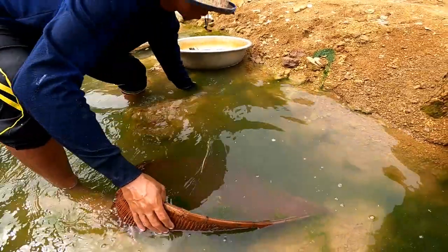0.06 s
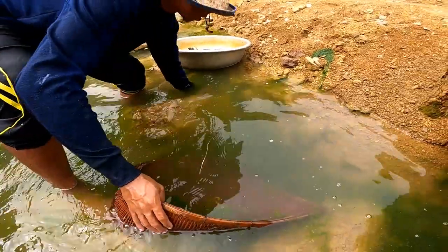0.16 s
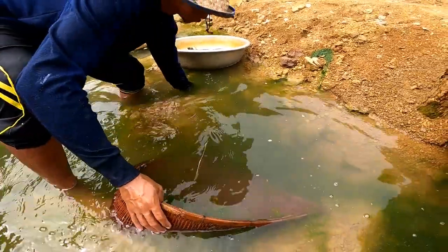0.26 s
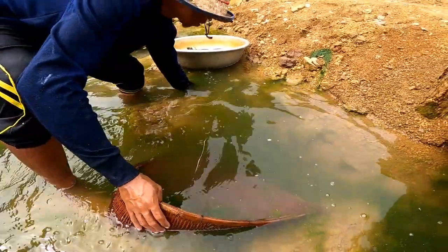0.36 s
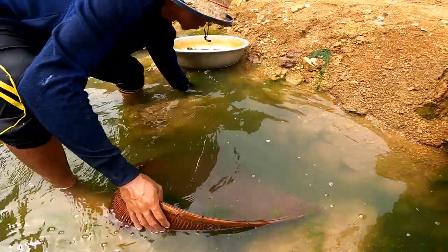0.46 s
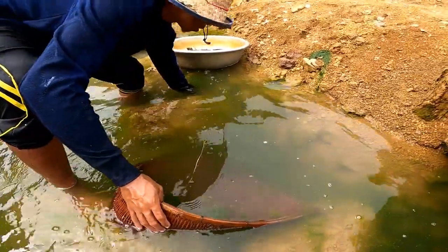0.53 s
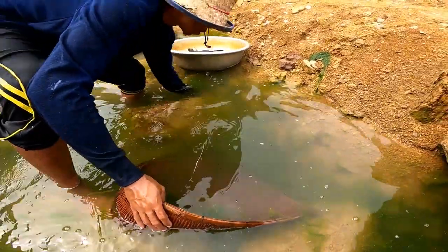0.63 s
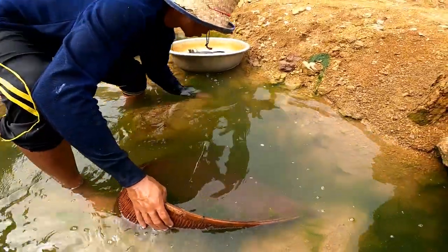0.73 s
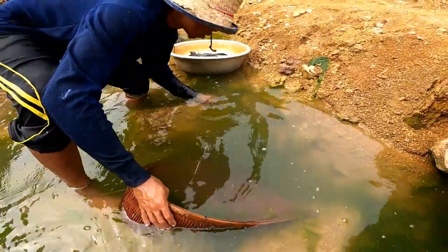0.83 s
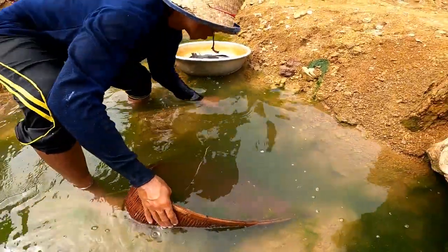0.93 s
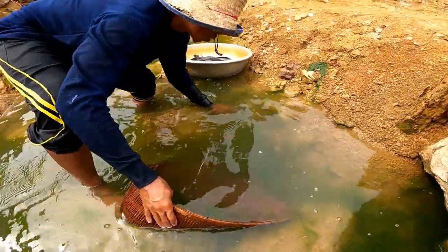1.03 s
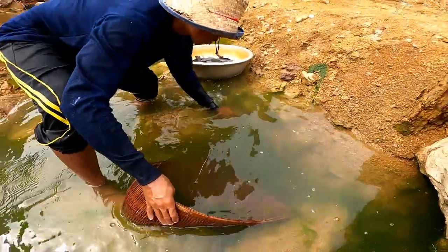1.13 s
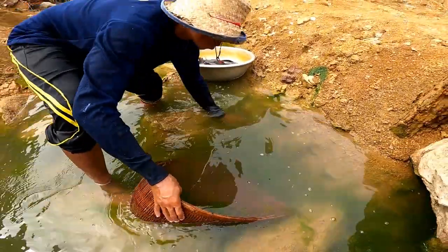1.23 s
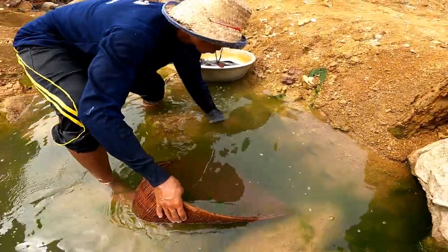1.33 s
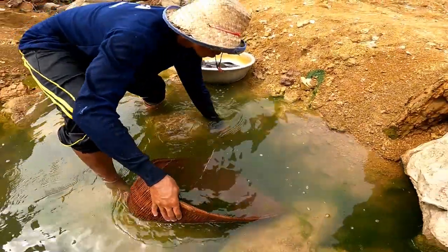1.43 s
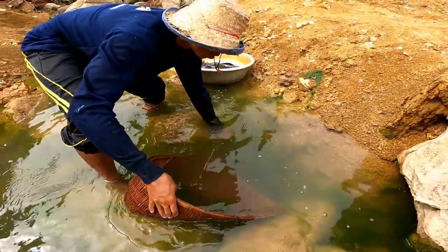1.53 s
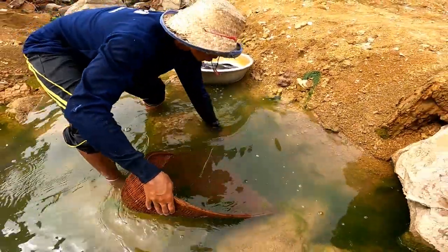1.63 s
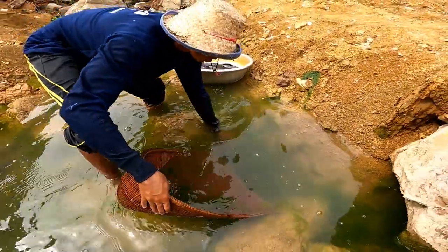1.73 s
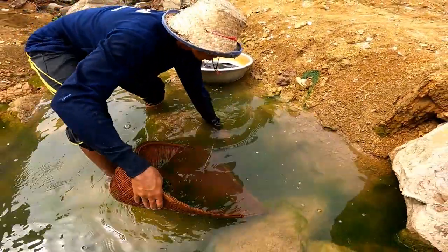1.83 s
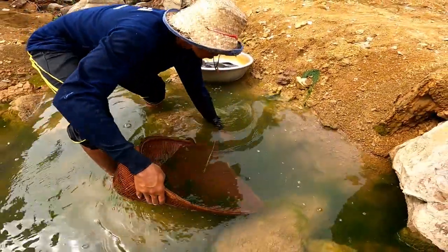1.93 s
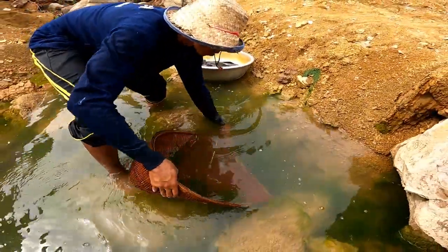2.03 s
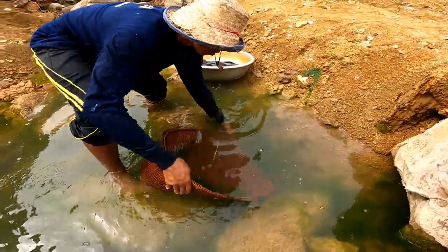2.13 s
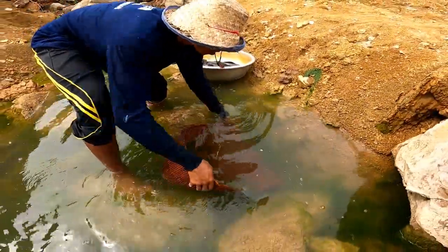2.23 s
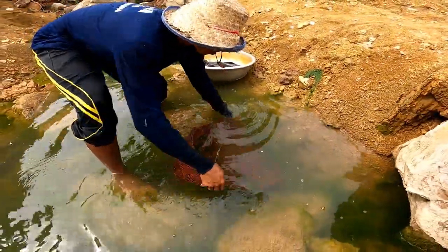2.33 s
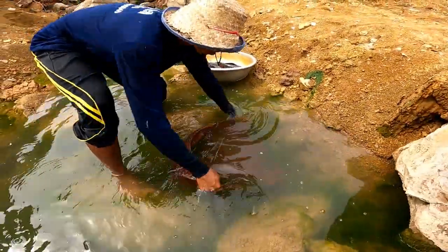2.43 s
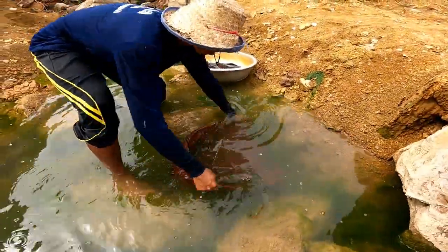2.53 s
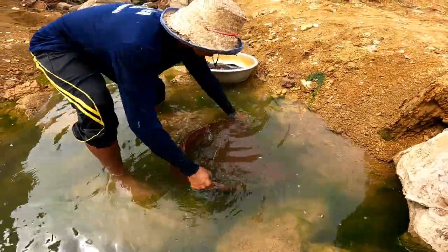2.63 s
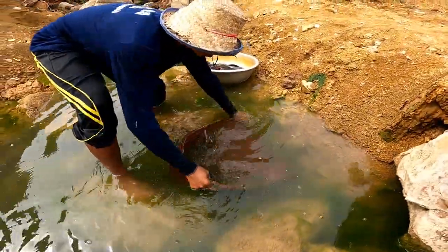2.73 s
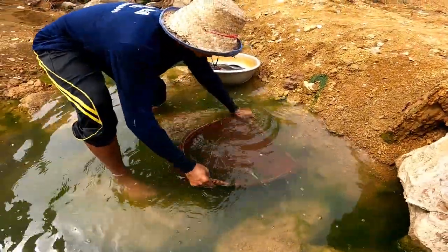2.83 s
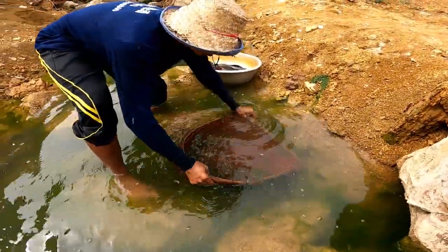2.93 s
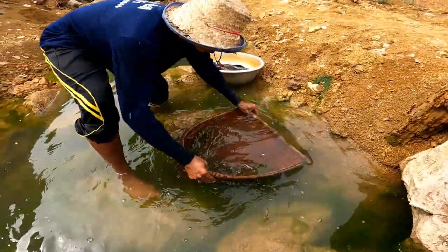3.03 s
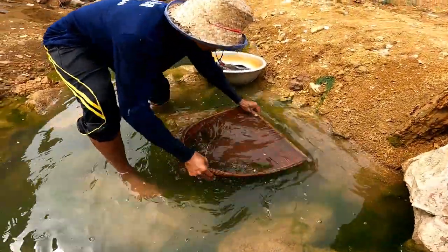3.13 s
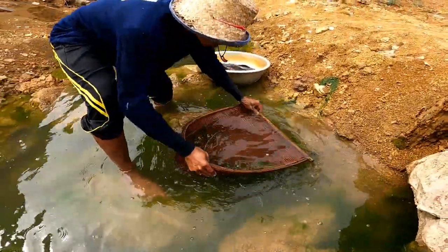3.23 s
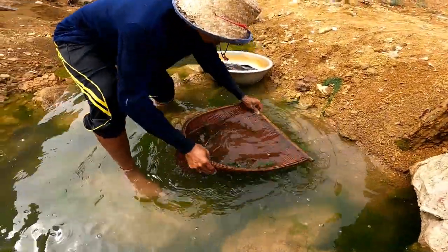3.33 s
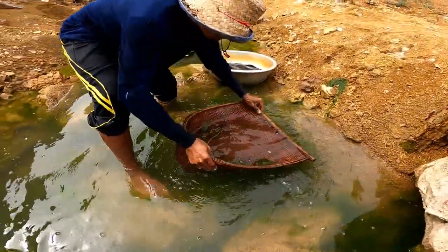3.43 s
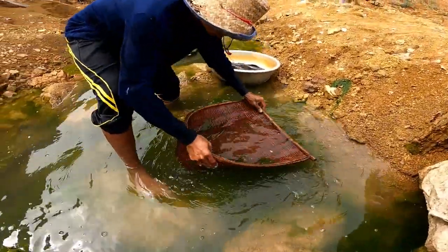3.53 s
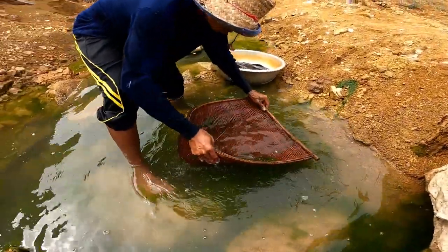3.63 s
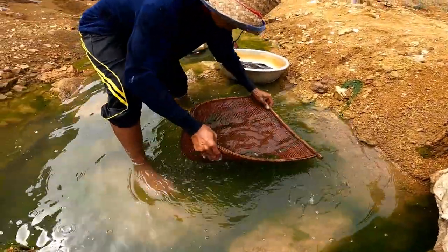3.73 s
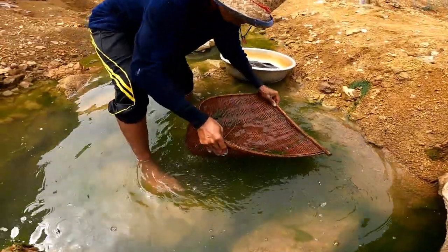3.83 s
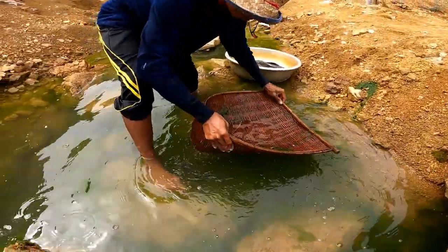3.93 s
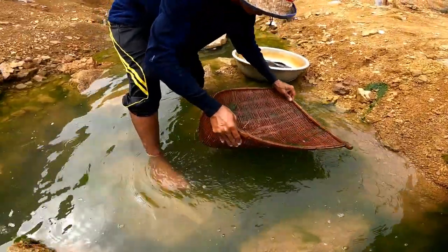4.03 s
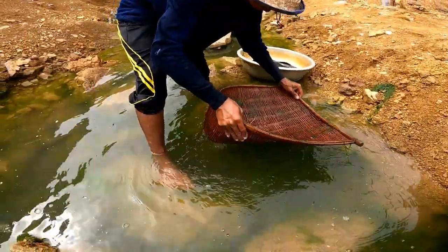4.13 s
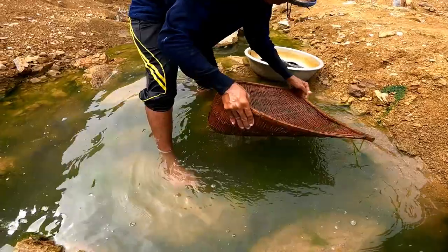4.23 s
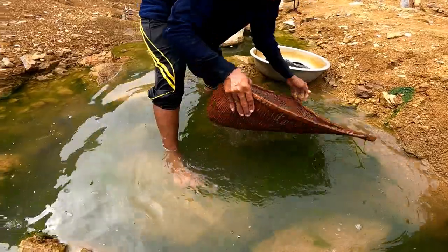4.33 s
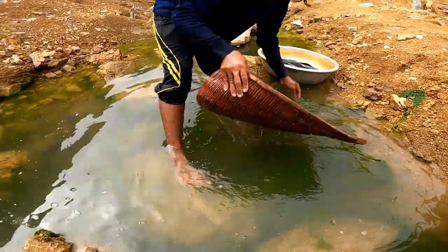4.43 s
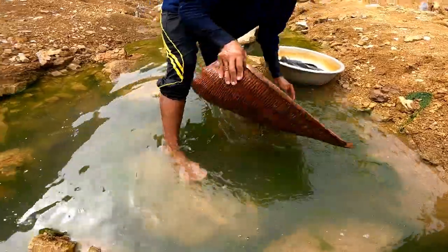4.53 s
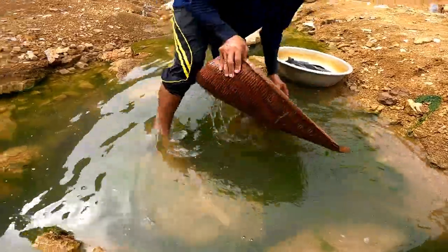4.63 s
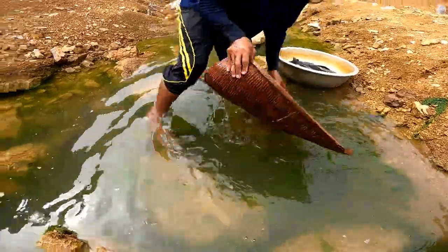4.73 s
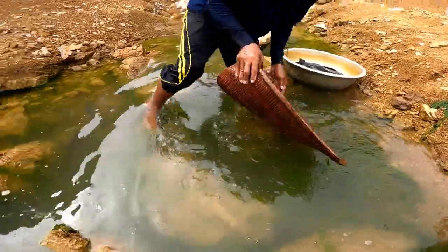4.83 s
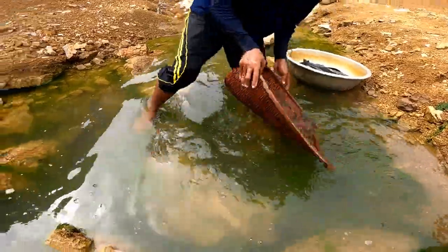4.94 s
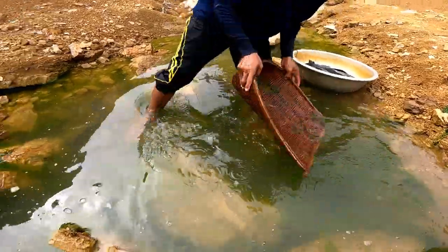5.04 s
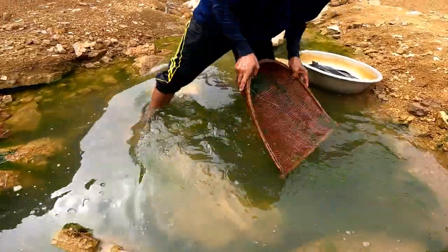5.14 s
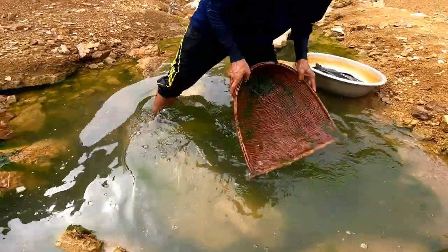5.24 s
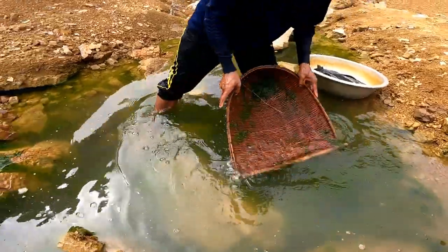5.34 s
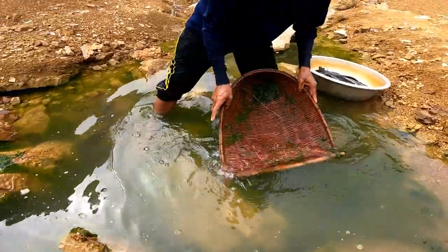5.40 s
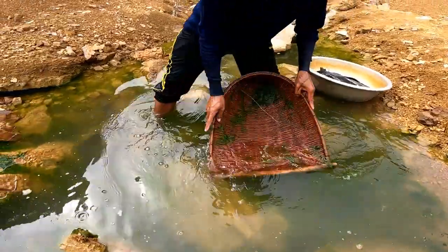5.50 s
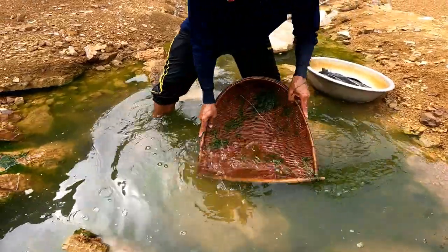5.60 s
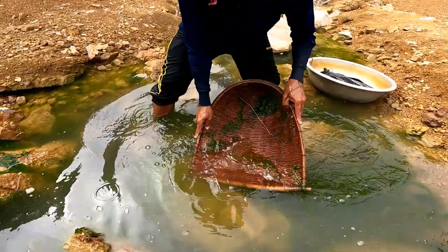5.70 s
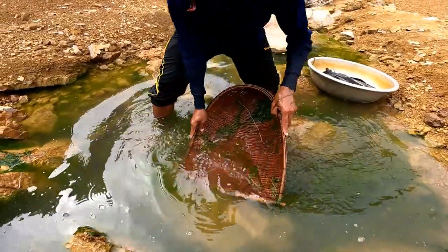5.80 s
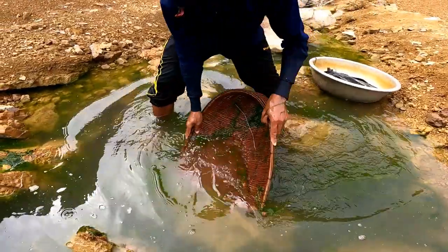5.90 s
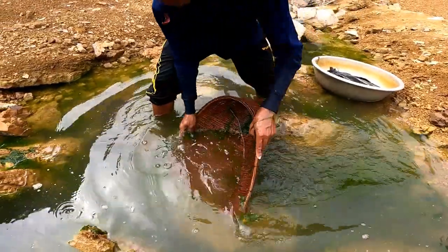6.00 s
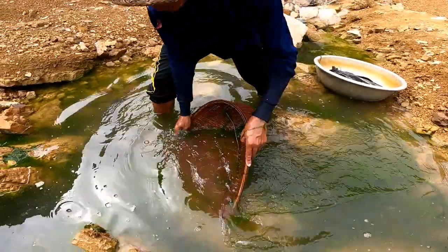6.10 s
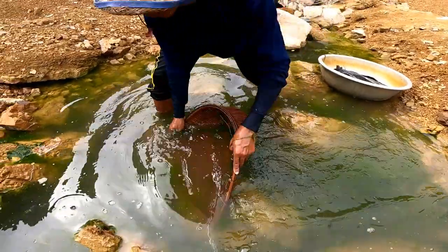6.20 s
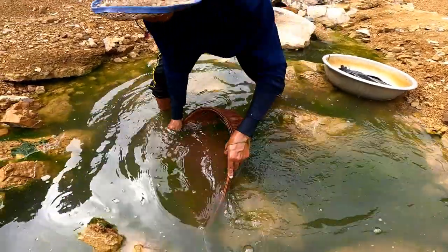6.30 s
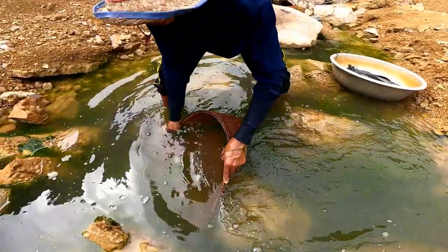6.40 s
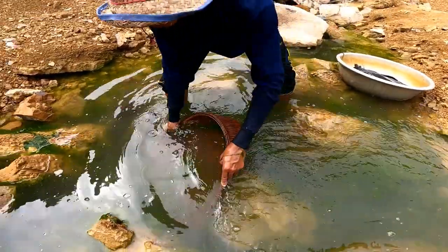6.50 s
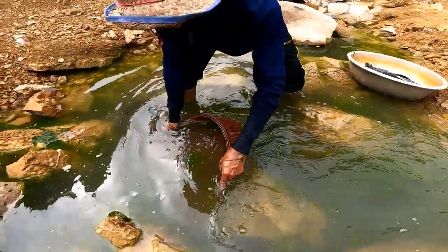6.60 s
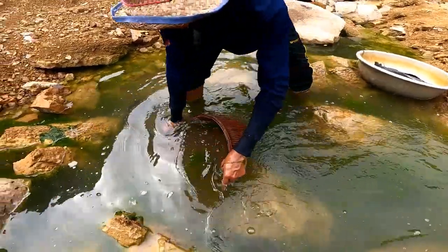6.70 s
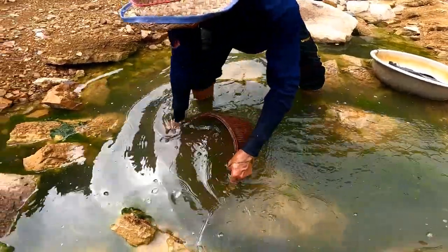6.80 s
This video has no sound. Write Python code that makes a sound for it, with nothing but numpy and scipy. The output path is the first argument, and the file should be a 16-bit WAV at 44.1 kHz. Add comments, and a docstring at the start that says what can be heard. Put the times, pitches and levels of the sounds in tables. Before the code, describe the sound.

Close outdoor stereo of a shallow rocky pool. At first only a soft hush, a few drops and a faint rustle of a sliding basket, with a weak bird whistle far off. Small splashes and bubbles come in the middle, then strong wet slaps, low thumps and gurgling as the basket comes out and dips again. Low wind buffets the microphones near the end.

```python
"""Water in a shallow rocky pool is stirred by a woven basket that is swept through it and lifted out.
Air bubbles ring as damped resonators, many rising in pitch, with a few low thumps made the same way.
Droplets slap the surface as noise bursts; crowds of random bubbles and a noise fizz follow the stirring.
Shaped noise makes the wind that buffets two close microphones, the hush, a rumble and a narrow rustle.
A short echo answers the water off the rocky bank; a gliding sine is a faint bird whistling far off."""
import sys
import numpy as np
from scipy import signal
from scipy.fft import rfft, irfft, next_fast_len
from scipy.io import wavfile
from scipy.ndimage import uniform_filter1d, map_coordinates

SR = 44100
rng = np.random.default_rng(int(sys.argv[2]) if len(sys.argv) > 2 else 0)


def int16_out(signal):
    """Quantize to a 16-bit WAV file."""
    q = np.round(np.clip(np.atleast_2d(signal).T, -1, 1) * 32767)
    wavfile.write(sys.argv[1], SR, q.astype(np.int16))


N = 302526  # samples


def amp(db):
    """Decibel law: the amplitude gain of a level in dB."""
    return 10 ** (np.asarray(db) / 20)


def unit(x):
    """Normalisation to a root-mean-square value of 1."""
    return x / np.sqrt(np.mean(x ** 2) + 1e-20)


def along(points, hz):
    """Logarithmic frequency scale: interpolates (frequency, value) points along it."""
    f, v = np.transpose(points)
    return np.interp(np.log(hz + 1), np.log(f + 1), v)


def curves(rows):
    """Piecewise-linear envelopes: one value per sample for each column after the time."""
    s, *cols = np.transpose(rows)
    return [np.interp(np.arange(N) / SR, s, c) for c in cols]


def wobble(rate):
    """Slow random modulation: a smooth curve of rms 1 through `rate` random knots a second."""
    knots = rng.standard_normal(int(N * rate / SR) + 4)
    return unit(map_coordinates(knots, [np.arange(N) * rate / SR]))


def filtered(x, response):
    """Linear filtering: the spectrum of x times a response of frequency."""
    m = next_fast_len(N + 8192)
    return irfft(rfft(x, m) * response(np.fft.rfftfreq(m, 1 / SR)), m)[..., :N]


def rush(spectrum, alike, patchy_db):
    """Partly coherent stereo noise of rms 1, with random gain in patches of time and frequency."""
    z = signal.stft(rng.standard_normal((2, N)), nperseg=256)[2]
    field = rng.standard_normal(z.shape[1:])
    field = uniform_filter1d(uniform_filter1d(field, size=6, axis=0), size=5, axis=1)
    pair = signal.istft(z * amp(patchy_db * unit(field)), nperseg=256)[1][:, :N]

    def mid_side(hz):
        # the balance of mid and side sets the left-right correlation
        turn = np.arccos(np.clip(along(alike, hz), -1, 1)) / 2
        return amp(along(spectrum, hz)) * [np.cos(turn), np.sin(turn)]

    mid, side = filtered(pair, mid_side)
    return unit(np.array([mid + side, mid - side]))


def swells(s, db, rise_s, fall_s, shape):
    """Power envelopes, one a row: 20 dB under the peak one rise before and one fall after it."""
    t = np.arange(N) / SR - s[:, None]
    u = np.where(t < 0, -t / rise_s[:, None], t / fall_s[:, None])
    return amp(2 * (db[:, None] - 20 * u ** shape))


def scatter(s, db, pan_db, rows):
    """Superposition with level panning: short sounds, one a row, added at their times; + is left."""
    size = rows.shape[1]
    at = (np.round(s * SR).astype(int)[:, None] + np.arange(size)).ravel()
    ports = []
    for side in (1, -1):
        sounds = amp(db + side * pan_db / 2)[:, None] * rows
        ports.append(np.bincount(at, sounds.ravel(), N + size)[:N])
    return np.array(ports)


def plinks(s, db, hz, life, rise, pan_db, size):
    """Bubble resonance: one that climbs to the surface glides up and bursts more abruptly."""
    t = np.arange(size) / SR
    hz, life, rise = hz[:, None], life[:, None], np.abs(rise)[:, None]
    u = t / life
    swell = 1 - np.exp(-(t * hz / 0.76) ** 2)  # the neck takes a cycle or two to pinch off
    decay = amp(-60 * np.minimum(u, 2) ** (1 + 2 * rise))
    ring = swell * decay * np.sin(2 * np.pi * hz * t * (1 + rise * u / 2))
    return scatter(s, db, pan_db, ring)


# separate splashes and pours: peak_time [s], level [dB], rise [s], fall [s], brightness [dB]
SPLASHES = [(0.069, -69.5, 0.068, 0.34, 15), (2.36, -55, 0.2, 0.44, 0.5), (2.53, -46, 0.21, 0.28, -1),
            (2.758, -45.5, 0.19, 0.18, -29), (2.98, -58, 0.063, 0.12, -3.5),
            (3.458, -52.5, 0.14, 0.21, -11.5), (3.751, -66.5, 0.22, 0.19, 6),
            (4.251, -58.5, 0.6, 0.77, -32), (4.62, -36.5, 0.17, 0.16, -13.5), (4.88, -36.5, 1, 0.89, -9),
            (5.15, -37, 0.21, 0.15, -10), (5.501, -40, 0.24, 0.24, -10), (5.7, -46, 0.19, 0.27, -25),
            (5.98, -50, 0.19, 0.14, -10), (6.26, -45.5, 0.28, 0.19, -8.5), (6.6, -55, 1, 1.8, -7)]
CALM_DB, CALM_BRIGHT_DB = -65.5, -5  # ripples between splashes
SPLASH_SHAPE = 1.42  # 1 = pointed peak, 2 = round


def stirring():
    """Power addition: splashes add up over the ripples, and the loudest sets the brightness."""
    *swell, bright_db = np.transpose(SPLASHES)
    power, calm = swells(*swell, SPLASH_SHAPE), amp(2 * CALM_DB)
    total = power.sum(0) + calm
    return 10 * np.log10(total), (bright_db @ power + CALM_BRIGHT_DB * calm) / total


def swarm(level_db, count, mid_hz, octaves, cycles, spike_db, size):
    """Random superposition of bubbles; strong stirring makes more and louder ones."""
    even, normal = rng.random((count, 3)), rng.standard_normal((count, 3))
    s = even[:, 0] * (N - 1) / SR
    stir_db = level_db[(s * SR).astype(int)]
    share = np.clip((stir_db + 65) / 18, .0025, 1)  # part of the crowd that is born
    hz = np.clip(mid_hz * 2 ** (octaves * normal[:, 0]), 400, 13500)
    life = np.minimum(cycles * 2 ** (0.95 * normal[:, 1]) / hz, size / SR)
    spike = -spike_db * np.log(rng.random(count) + 0.069)  # few strong among many weak
    db = stir_db + 3 * np.log2(hz / mid_hz) + spike
    born = even[:, 1] < share
    s, db, hz, life, even, normal = (v[born] for v in (s, db, hz, life, even, normal))
    rise = 0.4 * even[:, 2] ** 5  # most hardly glide
    return plinks(s, db, hz, life, rise, -1.5 + 0.52 * normal[:, 2], size=size)


# fizz spectrum: frequency [Hz], relative_density [dB per Hz]
FIZZ_SPECTRUM = [(180, 5), (300, -5.5), (484, 1.5), (663, -39), (1460, -3), (2360, -22), (3070, 2),
                 (7500, -4.5), (12100, -19), (15500, -20)]
# left-right correlation of the fizz: frequency [Hz], correlation [0-1]
FIZZ_COHERENCE = [(500, 0.93), (4000, 0.77), (9000, 1), (14000, 0.53)]


def stirred_water():
    """Bubble crowds and noise driven by one stirring envelope; fizz comes through the weave."""
    level_db, bright_db = stirring()
    clumps = wobble(45)  # drops come in bunches
    gurgle = swarm(level_db + 1 + 3.6 * wobble(30),
                   count=4500, mid_hz=1770, octaves=0.651, cycles=13.3, spike_db=1.5, size=1200)
    # bursting droplets
    crackle = swarm(level_db + bright_db + 9.5 + 2.66 * clumps,
                    count=5000, mid_hz=5590, octaves=0.49, cycles=16.6, spike_db=3, size=200)
    # deeper than the gurgle, stronger when the water sounds dull
    glugs = swarm(level_db - 0.4 * bright_db - 2.5,
                  count=500, mid_hz=1146, octaves=0.378, cycles=28.2, spike_db=3.0, size=2000)
    drip_db = level_db + 0.83 * np.minimum(level_db + 62, 0) + 0.72 * bright_db + 8.5 + 4.05 * clumps
    drips = swarm(drip_db, count=1300, mid_hz=2840, octaves=0.554, cycles=35.2, spike_db=3.5, size=1200)
    fizz_db = level_db - 8.5 + np.minimum(level_db + 48, 0)
    fizz = amp(fizz_db + 2.55 * clumps) * rush(FIZZ_SPECTRUM, FIZZ_COHERENCE, patchy_db=3.0)
    return gurgle + glugs + crackle + drips + fizz * amp([[-.7], [.7]])


# wandering breeze on the microphones: time [s], level [dB]
BREEZE = [(0, -61), (0.79, -47), (1.5, -49.5), (2.3, -48.5), (3.1, -53.5), (4.3, -47.5), (4.55, -53),
          (4.9, -49.5), (5.3, -35.5), (6.86, -45)]
# gusts: peak_time [s], level [dB], rise [s], fall [s]
GUSTS = [(1.95, -34.5, 0.061, 0.082), (2.1, -32.5, 0.17, 0.19), (5.02, -36, 0.045, .07),
         (5.176, -23.5, 0.066, 0.051), (5.308, -27, 0.066, 0.044), (5.45, -31, 0.066, 0.083),
         (5.599, -20.5, 0.033, .15), (5.721, -17.5, 0.14, 0.19), (5.831, -22, 0.08, 0.085),
         (6.09, -26.5, 0.11, 0.085), (6.28, -31.5, 0.15, .1), (6.381, -23.5, .12, 0.12),
         (6.53, -23.5, 0.031, 0.044), (6.65, -23.5, 0.18, 0.22), (6.802, -34.5, .1, 0.1)]
# buffeting spectrum: frequency [Hz], relative_density [dB per Hz]
BUFFET_SPECTRUM = [(12, -44), (22, -3), (41, 4.5), (89, -3.5), (198, -22), (257, -36), (450, -45),
                   (580, -61), (990, -120)]
GUST_SHAPE = 1.43  # 1 = pointed peak, 2 = round
ROAR_DB, ROAR_GROWS = -25, 2.2  # roar against buffeting at wind level -18 dB; dB of roar per dB of gust


def wind():
    """Turbulent pressure noise: low buffeting that hits the right port more in stronger gusts."""
    power = amp(2 * curves(BREEZE)[0]) + swells(*np.transpose(GUSTS), GUST_SHAPE).sum(0)
    level_db = 10 * np.log10(power)
    pan_db = -.25 * np.clip(level_db + 53.5, 0, 24)
    buffet = rush(BUFFET_SPECTRUM, [(30, 1.0), (150, 0.97), (400, 0.43)], patchy_db=1.5)
    # even out the noise's own swells, so that the level curves lead
    local_power = np.abs(uniform_filter1d(np.mean(buffet ** 2, 0), size=3000))
    buffet = buffet / np.sqrt(local_power + 0.066)
    roar_spectrum = [(120, -13), (230, -1), (400, -10.5), (700, -18.5), (1200, -120)]
    roar = rush(roar_spectrum, [(300, 0.97)], patchy_db=-2.0)
    roar_db = ROAR_DB + (ROAR_GROWS - 1) * (level_db + 18.0) + 3.7 * wobble(60)
    buffet = buffet + amp(roar_db) * roar
    return amp(level_db + 2.3 * wobble(25) + np.array([pan_db, -pan_db]) / 2) * buffet


# background hush: time [s], level [dB]
HUSH = [(0, -60.5), (.82, -63), (.9, -54.5), (1.7, -58.5), (2.2, -62.5), (3.1, -61), (4, -58.5),
        (6.86, -54.5)]
# hush spectrum: frequency [Hz], relative_density [dB per Hz]
HUSH_SPECTRUM = [(120, 3.5), (200, 3), (430, -9.5), (690, -9.5), (827, -18.5), (1050, -7.5), (2420, -15.5),
                 (2650, -13.5), (3890, -17.5), (7620, -16), (9660, -44), (13200, -88), (15500, -75)]
# left-right correlation of the hush: frequency [Hz], correlation [0-1]
HUSH_COHERENCE = [(300, 0.68), (1400, 0.47), (3000, 0.6), (7000, 0.92), (15000, 0.6)]
# soft rustle while the basket slides: peak_time [s], level [dB], rise [s], fall [s]
RUSTLE = [(.62, -64, 0.18, 0.22), (1.35, -56.5, 0.42, 0.17), (1.899, -64, 0.6, 0.3)]
# resonances of the rustle: centre_frequency [Hz]
RUSTLE_HZ = [1040, 1320, 1430, 1550]
RUSTLE_WIDTH_HZ = 45  # from the centre to half gain


def air():
    """Shaped broadband noise for hush and steady rumble; resonant bands of noise for the rustle."""
    hush = amp(curves(HUSH)[0]) * rush(HUSH_SPECTRUM, HUSH_COHERENCE, patchy_db=1.3)
    rumble = amp(-59) * rush([(50, -45), (110, 5.5), (170, 2), (260, -31)], [(100, 0.76)], patchy_db=2.5)
    bands = lambda f: sum(1 / (1 + ((f - hz) / RUSTLE_WIDTH_HZ) ** 2) for hz in RUSTLE_HZ)
    rustle = unit(amp(2.5 * wobble(18)) * filtered(rng.standard_normal(N), bands))
    return hush + rumble + np.sqrt(swells(*np.transpose(RUSTLE), 1.54).sum(0)) * rustle


# droplets slapping the surface: start [s], treble_level [dB], body_level_relative_to_treble [dB]
SLAPS = [(0.0588, -39, -12), (0.1146, -49.5, -16), (0.1945, -47.5, -9), (0.6345, -46, -30),
         (1.1628, -41, 1.5), (1.4576, -41, -22), (2.2812, -38.5, -10), (2.3221, -46.5, -6),
         (2.3675, -39, -12), (2.4124, -34, -1.5), (2.4433, -32, 2.5), (2.4548, -32.5, -7),
         (2.4694, -32.5, -6), (2.4862, -36, 1), (2.5326, -33.5, -5), (2.5456, -23.5, -8), (2.595, -30, -17),
         (2.6104, -36, -1), (2.6888, -40, 5), (2.7921, -42, 10), (2.9587, -48, 3), (3.277, -34, -26),
         (3.3782, -41, -2), (3.4286, -36.5, 3), (3.457, -31.5, -16), (3.8337, -41.5, -18),
         (4.2522, -37, -7), (4.358, -33.5, -8), (4.5935, -27, -3), (4.6448, -25, -4), (4.6892, -25, -10),
         (4.78, -34, 16.5), (4.814, -19.5, -21), (4.8663, -29.5, -2), (4.9038, -18, -13), (4.999, -33.5, 0),
         (5.1113, -26, -1), (5.2325, -34, 2), (5.4685, -28, -18), (6.0177, -29, -23), (6.137, -32, 1.5),
         (6.2662, -26.5, 2), (6.5899, -40, -20)]
# filter for a slap's treble: frequency [Hz], gain [dB]
SLAP_TREBLE = [(3000, -9), (5000, 8), (8000, 5.5), (11000, -4.5), (15500, -13)]
# filter for a slap's body: frequency [Hz], gain [dB]
SLAP_BODY = [(500, -24), (1500, 12.5), (4000, 8.5), (6000, -25)]


def slaps():
    """Impact noise: a wet crack, then a spray of fine droplets; each slap has its own share of body."""
    s, db, body_db = np.transpose(SLAPS)
    t = np.arange(2600) / SR
    luck = rng.standard_normal((len(s), len(t) + 2))
    spray_s = .02 * 2 ** (.4 * luck[:, :1])
    decay = amp(-60 * t / .003) + 0.55 * amp(-60 * t / spray_s)  # crack, then spray
    burst = luck[:, 2:] * (1 - np.exp(-t / .0004)) * decay
    pan_db = -.5 + 0.91 * luck[:, 1]
    treble = filtered(scatter(s, db, pan_db, burst), lambda hz: amp(along(SLAP_TREBLE, hz)))
    body = filtered(scatter(s, db + body_db, pan_db, burst), lambda hz: amp(along(SLAP_BODY, hz)))
    return treble + body


# clear bubbles, drops and a few low thumps: start [s], level [dB], start_pitch [Hz],
# life to -60 dB [ms], pitch_rise over the life [share of start_pitch]
CLEAR_NOTES = [(0.062, -24.5, 3230, 2.8, 0.07), (0.086, -43, 2440, 14, 0.24), (0.153, -52, 1420, 26, 0.34),
               (0.271, -37.5, 1640, 40, 0.28), (1.163, -40, 2280, 23, 0.19), (1.165, -37, 714, 85, 0),
               (1.165, -36.5, 1145, 22, 0.78), (1.705, -38, 1500, 15, 0.03), (1.705, -43, 982, 50, 1.9),
               (2.323, -34, 4500, 6.2, 0.36), (2.324, -39.5, 2130, 24, 0.13), (2.335, -44, 1020, 37, 0),
               (2.377, -38, 1700, 35, 0.15), (2.417, -18.5, 2910, 12, 0.15), (2.444, -36.5, 2770, 28, 0.93),
               (2.458, -24, 1610, 8.4, 0.1), (2.486, -27.5, 3110, 23, 0.09), (2.612, -33, 1920, 41, 0),
               (2.709, -29, 830, 16, 0), (2.744, -34, 1150, 26, .4), (2.813, -32, 1530, 12, .05),
               (2.857, -45, 1000, 60, .3), (2.725, -32, 477, 60, 0.32), (2.762, -37, 500, 38, 0.1),
               (2.758, -34.5, 1119, 70, 0.13), (2.767, -26.5, 1380, 18, 0.23),
               (2.793, -17, 1540, 6.4, 0.11), (2.813, -37, 520, 50, 0.25), (2.861, -38, 2840, 14, 0.68),
               (2.902, -40, 1716, 32, 0.39), (2.932, -38, 1360, 17, 0.2), (2.985, -37.5, 2130, 13, 0.72),
               (3.28, -49, 1530, 28, 0), (3.342, -38, 1576, 24, 0.22), (3.38, -32.5, 4310, 7, 0.03),
               (3.429, -21.5, 1227, 17, 0), (3.419, -43, 790, 150, 0), (3.439, -35, 1084, 74, 0),
               (3.479, -36.5, 1870, 13, 0.31), (3.49, -42, 1550, 25, 0), (3.502, -46, 1020, 80, .1),
               (3.538, -36, 4040, 9.7, 0), (3.56, -41, 1420, 31, 0.25), (3.735, -48, 1230, 50, 0),
               (3.751, -39, 1293, 79, 0.34), (3.975, -38.5, 2760, 28, 0), (4.067, -33, 4270, 7.8, 0.06),
               (4.158, -33, 3910, 22, 0), (4.214, -32.5, 3805, 21, 0.02), (4.282, -32, 1360, 110, 0.04),
               (4.314, -30.5, 500, 38, 0), (4.428, -23.5, 2710, 16, 0.07), (4.48, -25.5, 2640, 24, 0.05),
               (4.512, -30.5, 2540, 56, 0), (4.5625, -25, 4600, 12, 0), (4.567, -25, 1870, 36, 0.09),
               (4.596, -27.5, 3530, 13, 0.29), (4.604, -23, 1986, 9.9, 0.11), (4.646, -29, 1545, 41, 0.41),
               (4.66, -19, 1780, 17, 0.2), (4.681, -25.5, 1900, 19, 0.25), (4.741, -12.5, 4670, 4.3, 0),
               (4.76, -6, 304, 10.2, 0.32), (4.763, -7.5, 165, 20.4, 0.13), (4.795, -8.5, 2850, 4.6, 0.08),
               (4.83, -27, 2900, 14, 0), (4.851, -27, 3050, 20, 0), (4.873, -16, 1510, 20, 0.05),
               (4.895, -23, 3280, 16, 0), (4.968, -23.5, 1437, 37, 0.12), (4.965, -26, 200, 25, 0.1),
               (5.009, -23, 3400, 13, 0.13), (5.018, -13, 265, 9.2, 0.3), (5.02, -33, 925, 44, 0.9),
               (5.02, -20, 2770, 10, 0.11), (5.064, -14.5, 2870, 5, 0.24), (5.071, -26.5, 1460, 35, 0.15),
               (5.097, -25, 3090, 20, 0), (5.099, -26, 1980, 20, 0.1), (5.135, -28, 1000, 70, .4),
               (5.148, -10.5, 3800, 4.2, 0), (5.156, -25.5, 1330, 24, 0.13), (5.18, -21, 4870, 7.6, 0.03),
               (5.255, -26, 330, 14, 0.2), (5.296, -26, 4720, 7, 0.45), (5.475, -35, 743, 22, 0.51),
               (5.49, -32, 1506, 28, 0), (5.569, -35.5, 630, 66, 0.96), (5.681, -28.5, 1066, 54, 0.27),
               (5.72, -35, 1450, 45, 0.3), (5.794, -34, 492, 76, 0.15), (5.843, -31.5, 1750, 16, 0.08),
               (5.95, -41, 950, 35, 0.1), (6.14, -28, 1313, 25, 0.19), (6.24, -42, 422, 210, 0),
               (6.251, -30.5, 2210, 26, 0.1), (6.267, -20.5, 2550, 10, 0.1), (6.269, -37, 987, 43, 0.16),
               (6.44, -49, 580, 90, 0.4)]


def clear_bubbles_and_thumps():
    """Damped resonance with amplitude flutter from the choppy surface, a little right of centre."""
    s, db, hz, life_ms, rise = np.transpose(CLEAR_NOTES)
    pan_db = -1.5 + 1.0 * rng.standard_normal(len(s))
    flutter = amp(2.2 * wobble(170))
    return flutter * plinks(s, db, hz, life_ms / 1000, rise, pan_db, size=8192)


# far bird: time [s], pitch [Hz], level [dB]
BIRD = [(1.66, 2700, -110), (1.76, 2600, -68), (1.87, 2690, -70), (1.99, 3220, -67), (2.1, 3250, -79),
        (2.17, 3200, -110)]


def bird():
    """Frequency modulation: a thin whistled sine, blurred by the air on its way."""
    hz, level_db = curves(BIRD)
    blur = 1 + .022 * wobble(120)
    return amp(level_db + 4.1 * wobble(50.4)) * np.sin(2 * np.pi * np.cumsum(hz * blur) / SR)


# decay of the echo off the rocky bank: frequency [Hz], reverberation_time to -60 dB [s]
BANK_DECAY = [(300, 0.11), (2000, 0.054), (10000, 0.039)]


def bank(x):
    """Convolution with a decaying noise tail: a short echo whose treble dies first."""
    hz, t, z = signal.stft(rng.standard_normal((2, SR // 4)), SR, nperseg=256)
    decay = amp(-60 * t / along(BANK_DECAY, hz)[:, None])
    tail = signal.istft(z * decay, SR, nperseg=256)[1]
    late = np.pad(x, (200, 0))[None]  # delay in samples
    return signal.fftconvolve(late, tail / np.linalg.norm(tail[0]), axes=1)[:, :N]


def scene():
    """Superposition of all sources at the two microphones; the bank echoes only the water."""
    water = clear_bubbles_and_thumps() + slaps() + stirred_water()
    return water + amp(-13.5) * bank(water.mean(0)) + wind() + bird() + air()


# phase by which the right port leads: frequency [Hz], phase [rad]
PORT_LEAD = [(300, 0.043), (1300, 0.13), (3000, 0.63), (5000, 0.26), (9000, 0.51)]
# the microphones lose the highest treble: frequency [Hz], gain [dB]
MIC_RESPONSE = [(9000, -2.5), (12000, -8), (15500, -17)]
TOP_HZ = 15700  # band limit


def record(dry):
    """Phase difference between ports: the right port leads; treble falls off to a band limit."""
    def ports(hz):
        phase = along(PORT_LEAD, hz) * np.array([[-.5], [.5]])
        return np.exp(1j * phase) * amp(along(MIC_RESPONSE, hz)) * (hz < TOP_HZ)

    return filtered(dry, ports)


dry = scene()
out = record(dry)
int16_out(out)
```